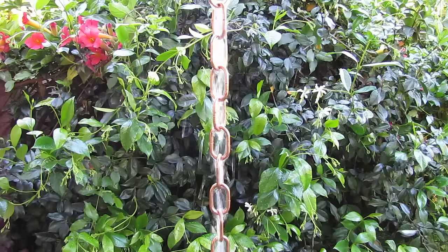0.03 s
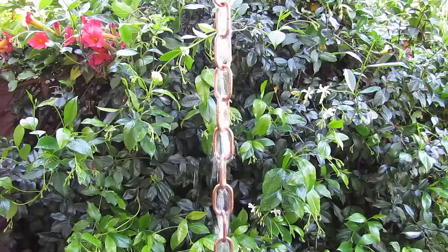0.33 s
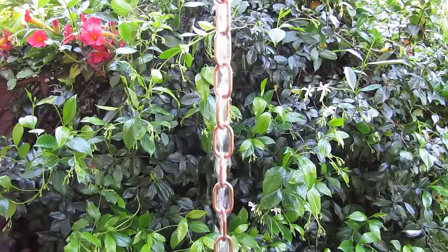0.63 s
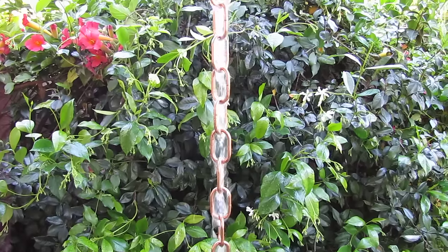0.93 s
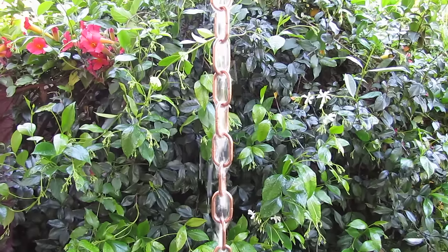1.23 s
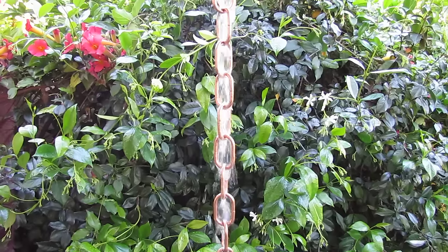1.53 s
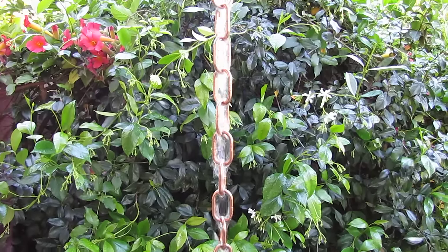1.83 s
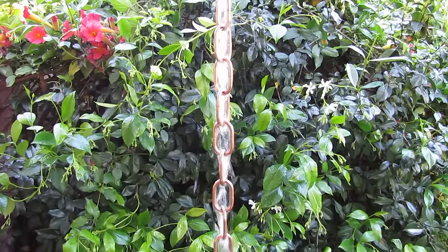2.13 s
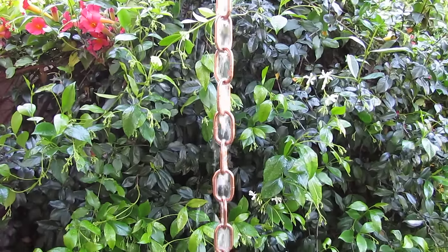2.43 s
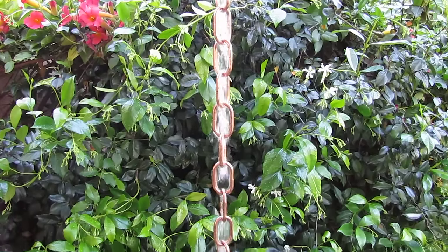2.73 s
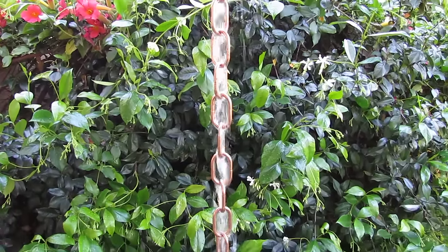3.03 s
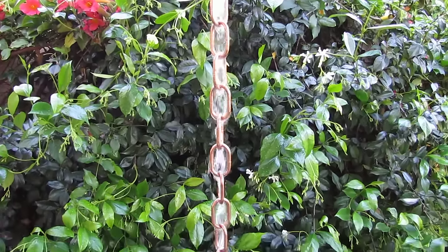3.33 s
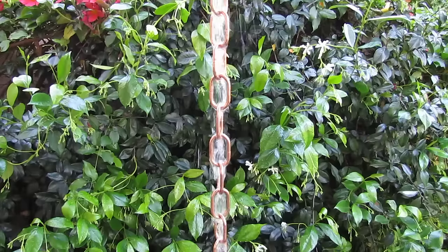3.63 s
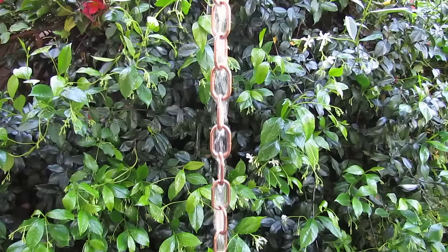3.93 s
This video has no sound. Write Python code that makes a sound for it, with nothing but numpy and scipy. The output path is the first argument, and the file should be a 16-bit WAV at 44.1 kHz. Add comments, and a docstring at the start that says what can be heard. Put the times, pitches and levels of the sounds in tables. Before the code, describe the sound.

Water trickles down a metal rain chain close by in a garden, swelling over two seconds and then holding steady. Small drips splat on leaves and lightly ring the links, over a low rumble and faint hum.

```python
"""A close patter of water, running down a copper rain chain in a garden, swells over two seconds.
Trapped air bubbles resonate as blips and fizz, bigger drops splat on leaves, and now and then a
drop sets a link ringing in its normal modes. Reflections from nearby walls add a short tail;
a low rumble with a faint hum lies underneath."""
import sys
import numpy as np
from scipy import signal
from scipy.fft import rfft, irfft
from scipy.io import wavfile
from scipy.ndimage import uniform_filter1d

SR = 44100
rng = np.random.default_rng(int(sys.argv[2]) if len(sys.argv) > 2 else 0)


def inscribe(sig):
    """Save sig as 16-bit PCM at rate SR to the path in sys.argv[1].

    A 1-D sig is mono; a 2-D sig holds one channel per row.
    Samples are clipped to [-1, 1] before scaling.
    """
    pcm = np.round(np.clip(np.atleast_2d(sig).T, -1, 1) * 32767)
    wavfile.write(sys.argv[1], SR, pcm.astype(np.int16))


N = 176400

# Swell of the trickle, tinkle and background. Each row: time in seconds, gain in dB.
SWELL_GAIN = [(0, -10), (.3, -8), (.75, -6.5), (1.25, -4.5), (1.75, -3), (2.2, -.5), (2.7, -0.5),
              (3.3, 0.5), (4, 0)]
# Strength of the flow. Each row: time in seconds, gain in dB.
FLOW_GAIN = [(0, -1), (.7, -0.5), (1.1, -2), (1.3, 0), (1.75, -2.5), (1.95, 0), (2.4, 1), (3.7, -0.5),
             (4, 1.5)]
# Spectral envelope of the trickle. Each row: frequency in Hz, gain in dB.
WATER_SPECTRUM = [(700, -28), (1300, -11.5), (1900, -6.5), (2600, -2), (3400, 0), (5200, 0.5), (7000, -3.5),
                  (10000, -11), (13000, -22.5), (16000, -21)]
# Strength of the bright fizz. Each row: time in seconds, gain in dB.
FIZZ_GAIN = [(0, -52.5), (1.2, -49), (1.35, -43), (1.75, -55), (1.92, -43.5), (2.3, -51.5), (2.55, -46.5),
             (2.9, -50), (3.15, -59), (4, -52.5)]
# Drips that trap a bubble. Each row: start in seconds, pitch in Hz, level in dB, decay in ms.
BUBBLE_DRIPS = [(0.137, 2600, -35, 2.6), (.187, 4600, -26, 1.7), (.27, 3000, -33.5, 3.6),
                (.392, 3800, -32, 3), (.465, 9200, -39.5, 8.2), (.530, 5980, -21, 1.35),
                (.561, 2830, -34, 3.7), (.667, 5800, -27, 1.5), (.964, 3210, -32.5, 2.3),
                (.977, 1670, -34.5, 7.5), (1.279, 2940, -27.5, 3), (1.489, 1654, -34.5, 6),
                (1.5575, 5900, -22, 0.9), (1.621, 1480, -29, 6), (1.722, 4600, -16, 1.4),
                (1.728, 4850, -24, 2.4), (1.786, 2970, -28, 2.5), (1.80, 1510, -33, 4.4),
                (1.882, 9750, -29.5, 1.4), (1.95, 1600, -32, 8), (1.969, 2220, -30, 4),
                (1.986, 1305, -33.5, 10), (2.098, 2400, -32.5, 6.1), (2.126, 7050, -17, 1.1),
                (2.142, 4200, -15.5, 1.4), (2.152, 2580, -33, 5.1), (2.361, 8700, -22.5, 1.2),
                (2.468, 6200, -21.5, 1.7), (2.516, 8660, -29, 6), (2.548, 9000, -32, 2.5),
                (2.697, 8900, -30, 2.5), (2.725, 5700, -23.5, 1.8), (2.738, 9200, -25.5, 5.3),
                (2.81, 9800, -32, 3), (2.837, 3400, -26, 3.5), (2.883, 6020, -20.5, 1.5),
                (3.056, 5800, -27, 1.7), (3.125, 2650, -30.5, 6.7), (3.147, 8740, -28, 2.5),
                (3.188, 5400, -21, 2.2), (3.492, 8570, -32.5, 8), (3.640, 7200, -18, 0.67),
                (3.936, 3070, -25.5, 5)]
# Drops that burst on leaves. Each row: start in seconds, spray level in dB, spray centre in Hz,
# spray decay in ms, crack level in dB.
LEAF_SPLATS = [(.748, -36, 8500, 2, -34), (1.037, -34, 7400, 10, -29), (1.431, -34.5, 7850, 8, -36),
               (1.624, -32, 6300, 14, -26), (2.142, -27, 4000, 11, -33), (2.384, -34, 4600, 22, -36),
               (2.739, -33, 8000, 9, -36), (2.9575, -28.5, 8250, 12, -21), (3.083, -34, 3200, 22, -42),
               (3.126, -33, 3900, 15, -28), (3.307, -30.5, 5170, 9, -33)]
# Drops that strike a link. Each row: start in seconds, level in dB.
LINK_STRIKES = [(.716, -33), (.746, -35), (1.551, -31), (2.064, -32), (2.388, -27.5), (2.437, -31),
                (2.835, -26.5), (2.958, -29.5), (3.2315, -16.5), (3.306, -27.5), (3.524, -27.5),
                (3.86, -31)]
# Modes of a link; the first two make the main tone die in two stages.
# Each row: frequency in Hz, relative level in dB, time to fall by 60 dB in seconds.
LINK_MODES = [(5226, -4, 0.11), (5205, -17, 0.27), (5300, -18, 0.14), (3340, -26, 0.16), (7120, -21, 0.1),
              (9300, -29, 0.11)]
# Stereo balance of water and links. Each row: frequency in Hz, left level over right in dB.
LEFT_BALANCE = [(1900, -5.5), (4000, -1), (8000, -0.6), (12000, 1)]
# Spectral envelope of the rumble. Each row: frequency in Hz, gain in dB.
RUMBLE_SPECTRUM = [(15, -11), (35, 2.5), (60, -1), (115, -3), (170, -6.5), (290, -5.5), (420, -9.5),
                   (700, -12.5), (1050, -15.5), (1310, -9.5), (1550, -16.5), (2000, -19.5), (4000, -35)]
# Tones of the hum. Each row: frequency in Hz, level before the swell in dB.
HUM_TONES = [(120, -58), (239.5, -54), (352, -59.5), (942, -62)]

TOP_HZ = 15700
TICKS_PER_S = 230


def trickle():
    """Superposition: countless droplets sum to patter and fizz, the finest to a wash of noise."""
    patter = droplets(per_s=2200, low_hz=910, high_hz=15950, cycles=1.26, spread=.49, pan_db=8)
    bubbles = droplets(per_s=850, low_hz=2420, high_hz=11870, cycles=5.1, spread=.52, pan_db=12)
    fizz = droplets(per_s=420, low_hz=6480, high_hz=11980, cycles=9.3, spread=.57, pan_db=4)
    ticks = droplets(TICKS_PER_S, low_hz=8000, high_hz=14900, cycles=2.2, spread=.54, pan_db=2)
    mid, side = rng.standard_normal((2, N))
    wash = (mid + .21 * side * np.array([[1], [-1]])) * undb(wander(25.33))
    wash = at_rms(colour(wash, WATER_SPECTRUM), db=-41)
    patter = at_rms(colour(patter, WATER_SPECTRUM) * undb(1.95 * wander(60)), db=-41.5)
    bubbles = at_rms(colour(bubbles, WATER_SPECTRUM), db=-42.5)
    sparkle = fizz / np.std(fizz) * envelope(FIZZ_GAIN) + at_rms(ticks, db=-52.5)
    clumps = undb(3.5 * wander(19))  # fizz and ticks rise and fall together
    return (patter + bubbles + wash) * envelope(FLOW_GAIN) + sparkle * clumps


def droplets(per_s, low_hz, high_hz, cycles, spread, pan_db):
    """Shot noise: blips at random times, with power-law strengths, decaying over about `cycles` periods."""
    out = np.zeros((2, N))
    chance = np.random.default_rng(rng.integers(2 ** 30))
    for when, pitch, length, size, place in chance.random((int(per_s * N / SR), 5)):
        hz = min(low_hz + (high_hz - low_hz) * pitch, TOP_HZ)
        decay_s = cycles * 2 ** (2 * length - 1) / hz
        strength = (1.03 - size) ** -spread / np.sqrt(decay_s)
        blip = strength * bubble(hz, decay_s, rise_s=decay_s / 10, glide=.02)
        leftward = 2 * place - 1
        add(out, when * N / SR, blip, pan_db * leftward, lag_s=35e-6 * leftward)
    return out


def bubble(hz, decay_s, rise_s, glide):
    """Damped resonance of trapped air; the pitch climbs by the fraction `glide` per decay time."""
    t = np.arange(int(6 * decay_s * SR) + 8) / SR
    phase = 2 * np.pi * hz * t * (1 + glide * t / decay_s / 2)
    return np.sin(phase) * np.exp(-t / decay_s) * (1 - np.exp(-t / rise_s))


def drips():
    """Air entrainment: each larger drip splashes briefly and traps a bubble that rings."""
    out = np.zeros((2, N))
    for at, hz, db, decay_ms in BUBBLE_DRIPS:
        add(out, at, undb(db) * bubble(hz, decay_ms / 1000, rise_s=2 / hz, glide=.012))
        add(out, at, undb(db - 8) * spray(hz, min(decay_ms, 5), octaves=.3))
    return out


def splats():
    """Impact noise: a drop hits a leaf with a short, broadband crack and bursts into spray."""
    out = np.zeros((2, N))
    for at, db, hz, decay_ms, crack_db in LEAF_SPLATS:
        crack = undb(crack_db) * spray(hz=10000, decay_ms=.58, octaves=.9)
        burst = undb(db) * spray(hz, decay_ms, octaves=.72)
        add(out, at, crack + burst)
    return out


def spray(hz, decay_ms, octaves):
    """Tiny clicks add incoherently to a band of grainy noise that decays exponentially."""
    t = np.arange(2 ** 12) / SR
    clicks = rng.standard_normal(len(t)) * np.exp(.66 * rng.standard_normal(len(t)))
    octaves_off = np.log2((np.fft.rfftfreq(len(t), 1 / SR) + 1) / hz)
    cloud = irfft(rfft(clicks) * np.exp(-.5 * (octaves_off / octaves) ** 2))
    return cloud / np.std(cloud) * np.exp(-1000 * t / decay_ms)


def links():
    """Impulse excitation: single drops splash and ring the links; light taps keep up a faint tinkle."""
    out = np.zeros((2, N))
    for at, db in LINK_STRIKES:
        length = min(1, undb((-21 - db) / 4))  # drops above -21 dB wet the link and damp it
        add(out, at, undb(db) * link_ring(length))
        add(out, at, undb(db - 14.5) * spray(LINK_MODES[0][0], decay_ms=7.1, octaves=.3))
    taps = rng.standard_normal((2, N)) * (rng.random(N) < TICKS_PER_S / SR)
    tinkle = signal.fftconvolve(taps, link_ring(length=1)[None], axes=1)[:, :N]
    return out + at_rms(tinkle, db=-53) * envelope(SWELL_GAIN)


def link_ring(length):
    """Free vibration in damped normal modes, slightly detuned by the water on the link."""
    t = np.arange(SR // 2) / SR
    tuning = 1 + .004 * rng.uniform(-1, 1)
    return sum(undb(db - 60 * t / (t60 * length)) * np.sin(2 * np.pi * hz * tuning * t)
               for hz, db, t60 in LINK_MODES)


def walls(x, t60_s=.064, tail_db=-7):
    """Reverberation: diffuse reflections from nearby walls follow the direct sound."""
    t = np.arange(SR // 4) / SR
    response = rng.standard_normal((2, len(t))) * undb(-60 * t / t60_s) * (t > .002)
    response *= undb(tail_db) / np.sqrt(np.sum(response ** 2) / 2)
    response[:, 0] = 1  # direct sound
    return signal.fftconvolve(x, response, axes=1)[:, :N]


def background():
    """Decorrelation widens a rumble above the bass; phase and amplitude modulation make a hum waver."""
    mid, side = (colour(noise, RUMBLE_SPECTRUM) for noise in rng.standard_normal((2, N)))
    width = np.minimum(.1 + .35 * np.fft.rfftfreq(N, 1 / SR) / 1500, .55)
    side = irfft(rfft(side) * width, N) * np.array([[1], [-1]])
    out = at_rms(mid + side, db=-40)
    t = np.arange(N) / SR
    for hz, db in HUM_TONES:
        tone = np.sin(2 * np.pi * hz * t + hz / 400 * wander(7))
        out += at_rms(tone * undb(2.4 * wander(9.8)), db)
    return out


def undb(db):
    """Amplitude ratio from decibels."""
    return 10 ** (np.asarray(db) / 20)


def at_rms(x, db):
    """Scaling to a root-mean-square level."""
    return x * undb(db) / np.sqrt(np.mean(x ** 2))


def envelope(rows):
    """Amplitude envelope through rows of seconds and dB."""
    return undb(np.interp(np.arange(N) / SR, *np.array(rows).T))


def colour(x, rows):
    """Spectral shaping by rows of Hz and dB."""
    hz, db = np.array(rows).T
    gain_db = np.interp(np.log(np.fft.rfftfreq(N, 1 / SR) + 1), np.log(hz), db)
    return irfft(rfft(x) * undb(gain_db), N)


def wander(per_s):
    """Smooth random fluctuation with a standard deviation near 1."""
    hold = int(SR / per_s)
    steps = np.repeat(rng.standard_normal(N // hold + 1), hold)
    return 1.2 * uniform_filter1d(steps, hold)[:N]


def add(out, at, sound, pan_db=0, lag_s=0):
    """Mixing with level and time differences: a sound from the left is louder and earlier there."""
    for channel, sign in zip(out, (1, -1)):
        start = int(np.clip((at - sign * lag_s / 2) * SR, 0, N - 1))
        channel[start:start + len(sound)] += undb(sign * pan_db / 2) * sound[:N - start]


def scene():
    """The sources superpose; level differences put the water's body right, its top treble just left."""
    swell = envelope(SWELL_GAIN)
    left, right = walls(trickle() * swell + drips() + splats()) + links()
    left = colour(left, np.array(LEFT_BALANCE) * [1, .5])
    right = colour(right, np.array(LEFT_BALANCE) * [1, -.5])
    return np.array([left, right]) + background() * swell


def record(dry, silence_s=.035):
    """Band limiting: a steep low-pass cuts the top of the sound, which starts after a brief silence."""
    low_pass = signal.ellip(10, .2, 80, TOP_HZ, fs=SR, output="sos")
    return signal.sosfilt(low_pass, dry * (np.arange(N) > silence_s * SR))


dry = scene()
out = record(dry)
inscribe(out)
```